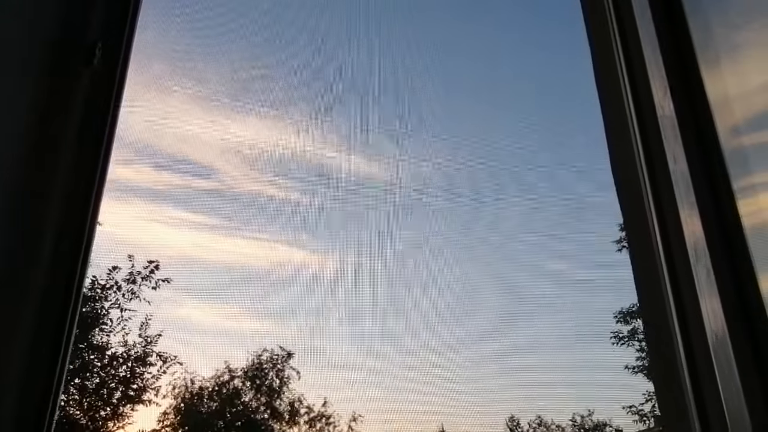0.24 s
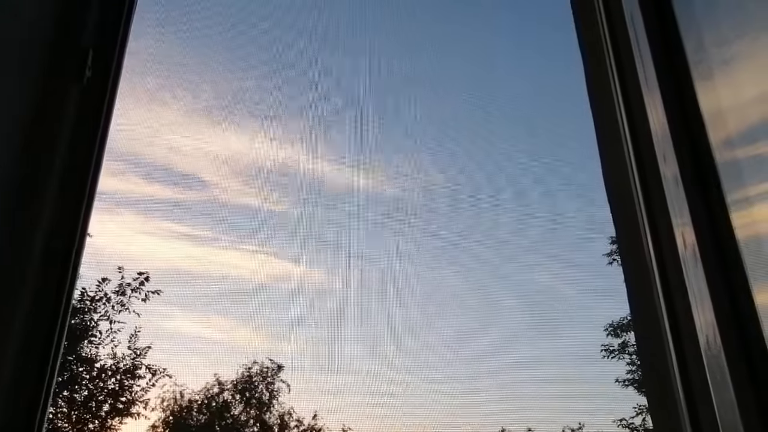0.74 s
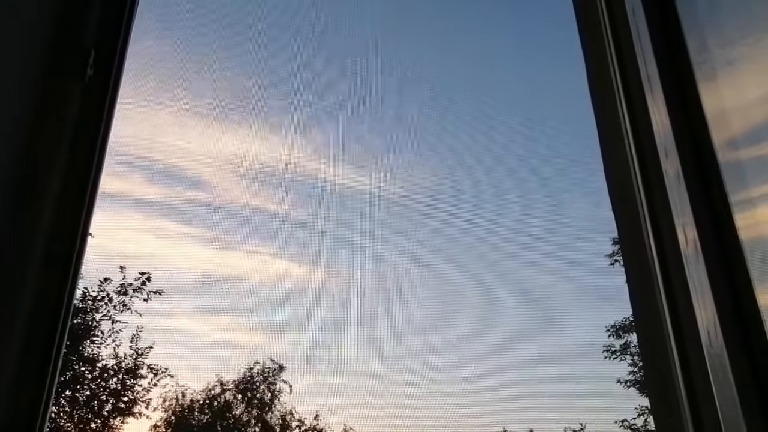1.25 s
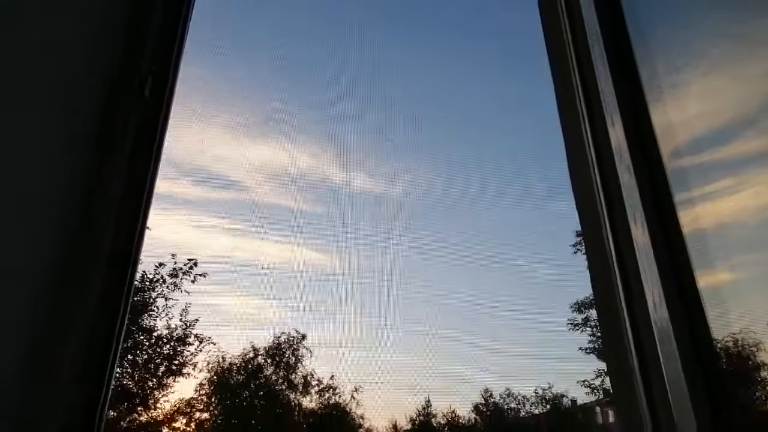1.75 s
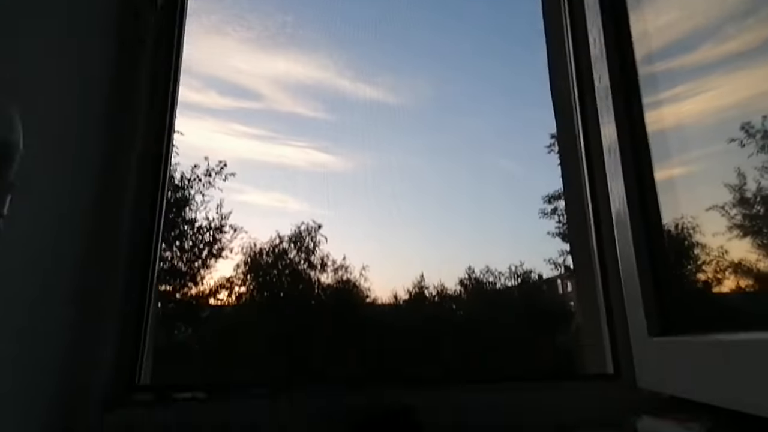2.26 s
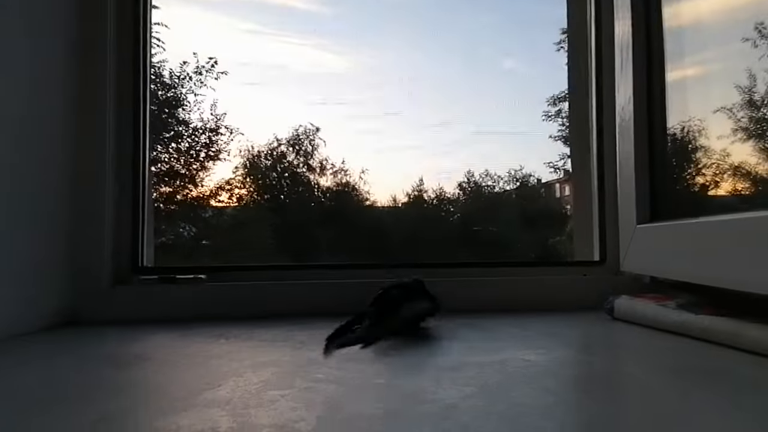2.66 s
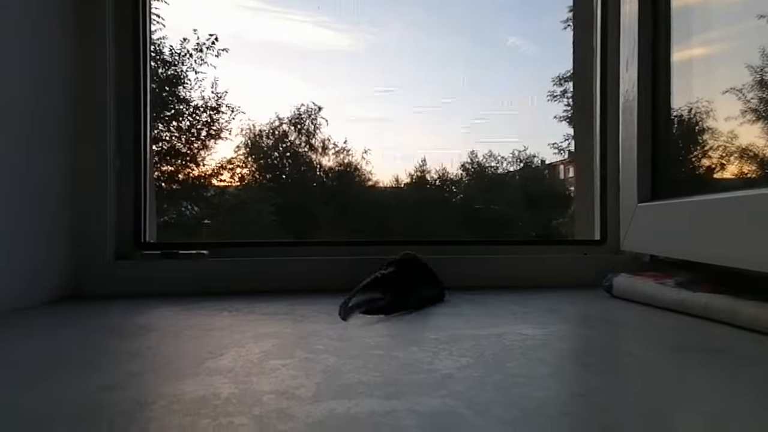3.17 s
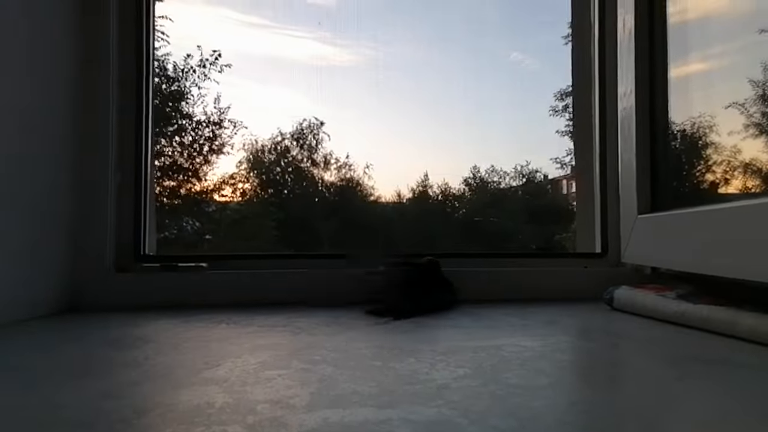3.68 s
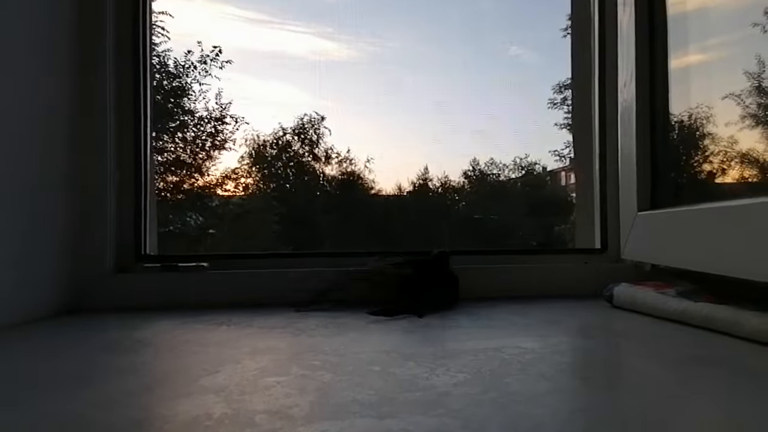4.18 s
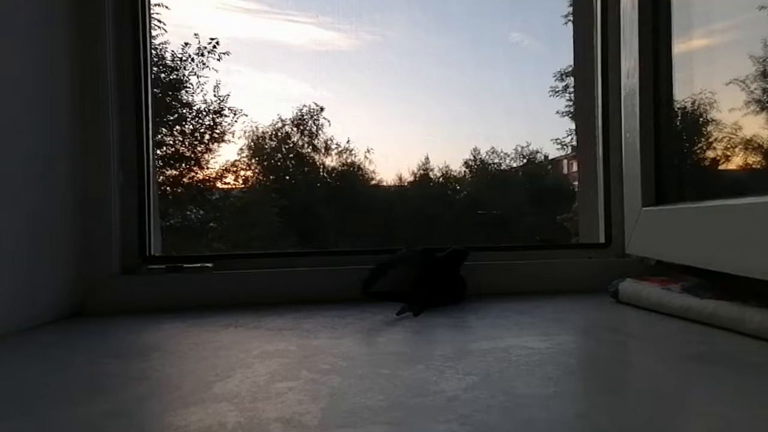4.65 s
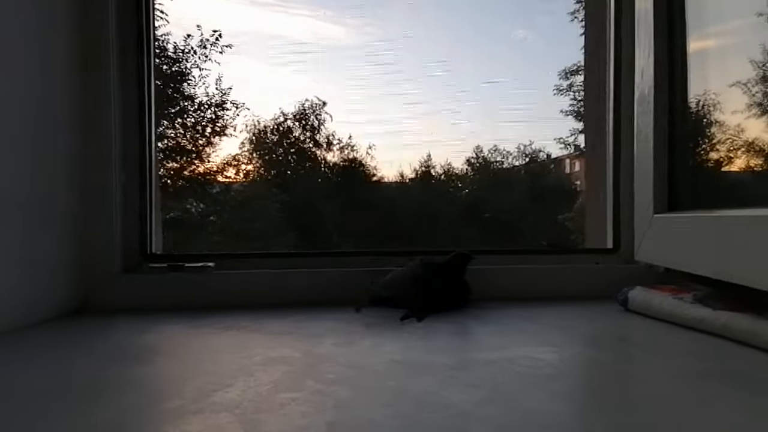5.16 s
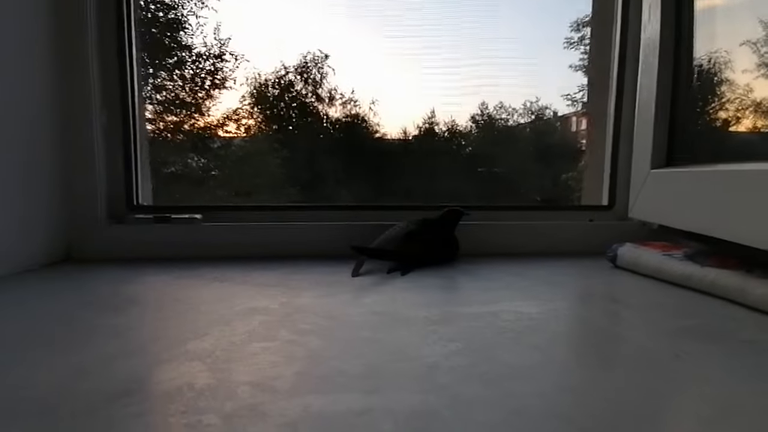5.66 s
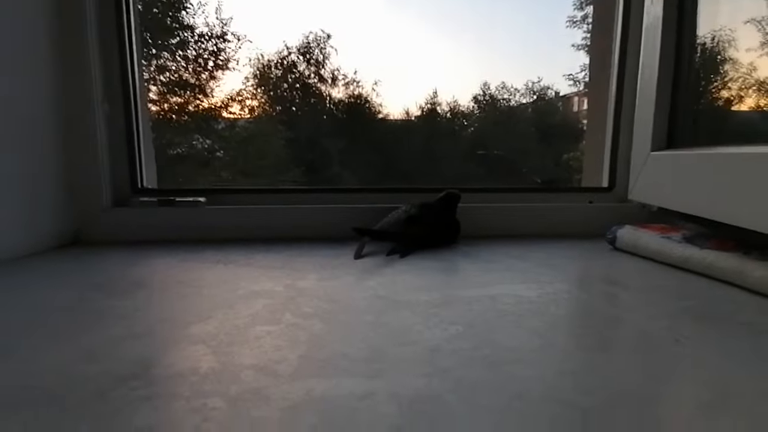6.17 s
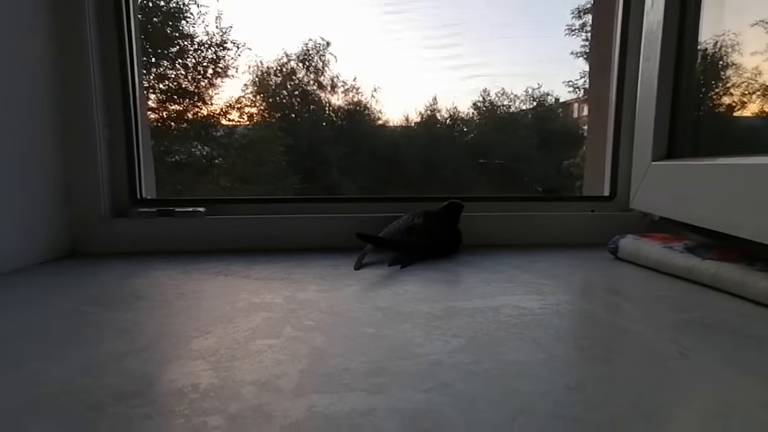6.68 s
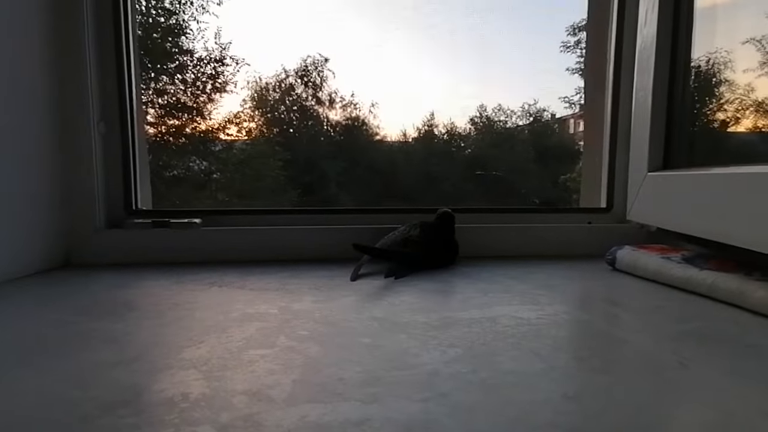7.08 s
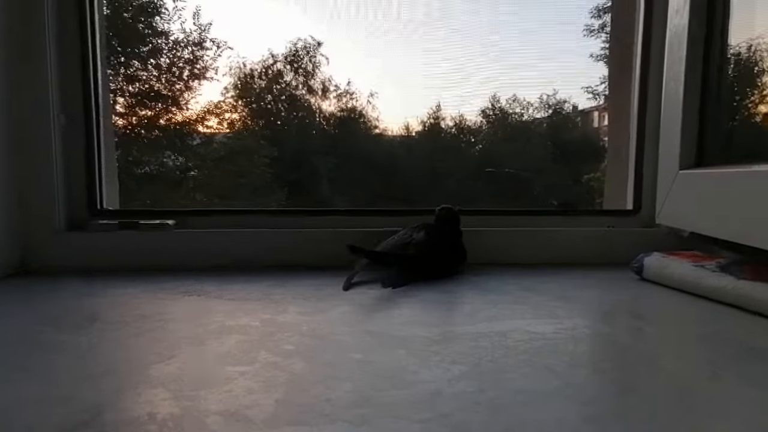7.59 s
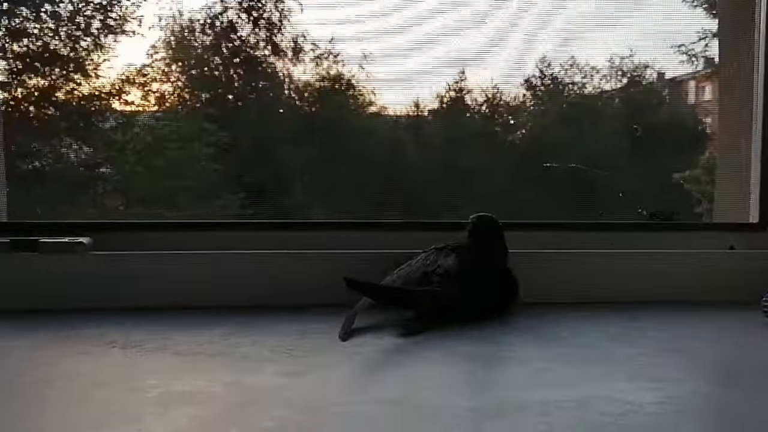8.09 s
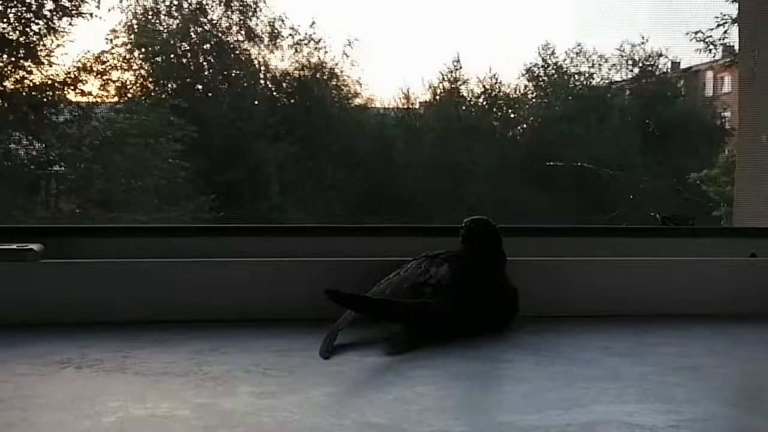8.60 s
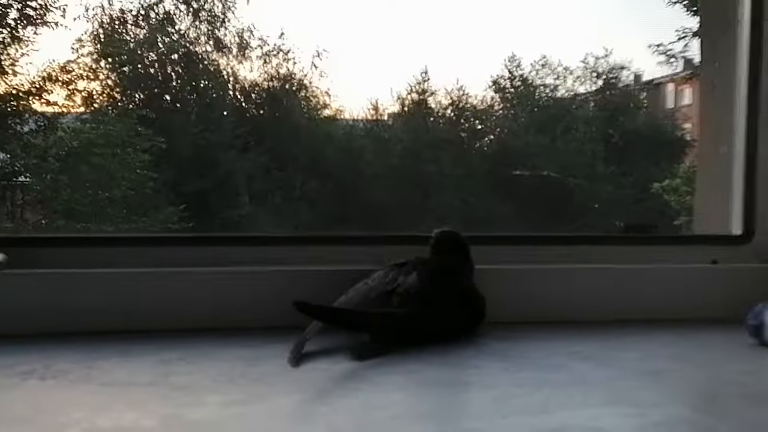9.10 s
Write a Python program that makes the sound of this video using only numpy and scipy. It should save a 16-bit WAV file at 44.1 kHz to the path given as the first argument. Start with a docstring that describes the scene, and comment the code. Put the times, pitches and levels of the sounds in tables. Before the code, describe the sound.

At an open window at dusk, a flock of swifts screams almost without pause: thin rising whistles turn buzzy and break into falling pips, echoing off house walls. Close to the stereo phone microphones, a grounded bird rustles its feathers and ticks its claws on the sill, mostly from two to four seconds. A wavering low hum and faint distant town noise stay underneath, and the calls thin toward the end.

```python
"""Swifts past an open window

At dusk a flock screams past: each whistle sweeps up, turns buzzy and breaks into falling pips; some calls are bare trills.
Farther birds come only as echoes, made of drifting sines; the house walls and window bay answer the near ones.
Close to the two microphones a grounded bird on the sill rustles (clumped noise) and ticks its claws (short cracks).
Two low unsteady tones and shaped town noise lie underneath, and a hand bumps the phone once."""
import sys
import numpy as np
from scipy import signal
from scipy.fft import rfft, irfft, next_fast_len
from scipy.io import wavfile
from scipy.ndimage import uniform_filter1d, map_coordinates

SR = 44100
rng = np.random.default_rng(int(sys.argv[2]) if len(sys.argv) > 2 else 0)


def bounce(signal):
    """Save signal as a 16-bit WAV file at the path given by the first command-line argument."""
    frames = np.transpose(np.atleast_2d(signal))
    limited = np.clip(frames, -1, 1)
    pcm = np.round(limited * 32767).astype(np.int16)
    wavfile.write(sys.argv[1], SR, pcm)


def volts(x):
    """Linear amplitude factor 10**(x/20) for a level x in dB, scalar or array-like."""
    e = np.asarray(x, float) / 20
    return 10 ** e


N = 411894


def unit(x):
    """Scaled to rms 1."""
    return x / np.sqrt(np.mean(x ** 2) + 1e-20)


def along(points, hz):
    """(frequency [Hz], value) points read on a log frequency axis."""
    f, v = np.transpose(points)
    return np.interp(np.log(hz + 1), np.log(f + 1), v)


def curves(rows):
    """One value per sample for each column after the time."""
    s, *cols = np.transpose(rows)
    return [np.interp(np.arange(N) / SR, s, c) for c in cols]


def wobble(rate, size=N):
    """A smooth random curve with rate knots a second, at most 400."""
    knots = rng.standard_normal(int(size * 400 / SR) + 4)
    return map_coordinates(knots, [np.arange(size) * min(rate, 400) / SR])


def coloured(x, spectrum):
    """x through a (frequency [Hz], gain [dB]) spectrum."""
    m = next_fast_len(N + 8192)
    gain = volts(along(spectrum, np.fft.rfftfreq(m, 1 / SR)))
    return irfft(rfft(x, m) * gain, m)[..., :N]


def echoes(x, t60, delay):
    """A diffuse answer after delay [s], falling 60 dB in t60 [s], different at each microphone."""
    t = np.arange(SR // 2) / SR
    tail = rng.standard_normal((2, len(t))) * volts(-60 * t / t60) * (t > delay)
    return signal.fftconvolve(x[None], tail / np.linalg.norm(tail[0]), axes=1)[:, :N]


# colour of the distant town: (frequency [Hz], relative level per Hz [dB])
TOWN_COLOUR = [(62, -1.5), (110, 6.5), (200, -3), (450, -4.5), (800, -12.5), (1500, -19), (2100, -20),
               (4000, -29), (7000, -19), (8000, -31), (15500, -34.5)]
# how alike the two microphones hear it: (frequency [Hz], left-right correlation [-1 to 1])
TOWN_LIKENESS = [(80, 0.23), (300, 1), (700, 0.053)]


def town():
    """Distant traffic and air: noise most alike at both microphones in the upper bass, nearly unrelated in the treble."""
    m = next_fast_len(N)
    hz = np.fft.rfftfreq(m, 1 / SR)
    # the angle between mid and side noise sets the correlation
    turn = np.arccos(np.clip(along(TOWN_LIKENESS, hz), -1, 1)) / 2
    spectrum = rfft(rng.standard_normal((2, m))) * volts(along(TOWN_COLOUR, hz))
    mid, side = irfft(spectrum * [np.cos(turn), np.sin(turn)], m)[:, :N]
    balance = volts([[1.4], [-1.4]])  # left, right
    return volts(-58.5) * unit(np.array([mid + side, mid - side])) * balance


# two hums, before their wobble and stereo balance: (time [s], lower hum level [dB], upper hum level [dB])
HUM_LEVELS = [(0, -62.5, -69.5), (1.56, -66, -79.5), (2.36, -55, -62), (3.38, -59.5, -57),
              (4.6, -61, -57.5), (5.82, -54, -57), (6.55, -51.5, -65), (7, -59.5, -64), (7.75, -48.5, -70),
              (8.48, -57, -63.5), (9.2, -48.5, -75)]


def hum():
    """Two low tones, slightly unsteady in pitch and level, stronger on the left."""
    low_db, high_db = curves(HUM_LEVELS)
    low_hz = 91 + 4 * wobble(12)
    high_hz = 128 + 3 * wobble(3.6)
    low = volts(low_db + 1.5 * wobble(23)) * np.sin(2 * np.pi * np.cumsum(low_hz) / SR)
    high = volts(high_db + 2.1 * wobble(16)) * np.sin(2 * np.pi * np.cumsum(high_hz) / SR)
    return (low + high) * volts([[2.2], [-2.6]])


def knock():
    """One soft low bump of a hand on the phone: a damped push and rebound, the same at both microphones."""
    start_s, decay_s = 2.1462, 0.0011
    u = np.maximum(np.arange(N) / SR - start_s, 0) / decay_s
    return volts(-34.0) * (1 - u) * np.exp(-u) * (1 - np.exp(-6 * u))


# farther birds, blurred by echoes: (time [s], centre pitch [Hz], level before the echoes [dB])
FAR_BIRDS = [(0, 6610, -48.5), (.3, 6200, -71), (.75, 5836, -53), (1.55, 5740, -53), (2.6, 5565, -65.5),
             (5.85, 5750, -79), (6.35, 5890, -49.5), (6.8, 6730, -67), (7.1, 5480, -51), (7.7, 5710, -67.5),
             (8.7, 5570, -64.5), (9.34, 5220, -64)]


def far_flock():
    """Twelve buzzing whistles that drift round a common pitch, heard only through echoes."""
    centre_hz, db = curves(FAR_BIRDS)
    voices = 0
    for _ in range(12):
        hz = centre_hz + 230 * wobble(8) + 200 * wobble(250)  # slow drift and fast buzz
        level = volts(3 * wobble(9) + 5 * wobble(80))
        voices = voices + level * np.sin(2 * np.pi * np.cumsum(hz) / SR)
    return echoes(volts(db) * unit(voices), t60=0.2, delay=0)


def cracks(rows, spectrum):
    """Dry snaps: noise that dies within a few milliseconds, then coloured."""
    out, t = np.zeros(N + SR), np.arange(400) / SR
    for s, db in rows:
        snap = np.exp(-(t / 0.002) ** 2) * rng.standard_normal(len(t))
        out[round(s * SR):][:len(t)] += volts(db) * snap
    return coloured(out[:N], spectrum)


# feather strokes on the sill: (time of peak [s], level before the grain and left-hand colour [dB])
FEATHER_STROKES = [(1.51, -60.5), (1.599, -53.5), (1.754, -54.5), (1.927, -42.5), (2.151, -57),
                   (2.447, -55.5), (2.698, -45.5), (3.175, -48.5), (3.42, -55.5), (3.502, -61.5),
                   (3.702, -45), (4.084, -53), (4.152, -52)]
# feather colour: (frequency [Hz], relative level per Hz [dB])
FEATHER_COLOUR = [(1600, -24), (2500, -13.5), (3200, -18.5), (4600, -13), (7000, -2.5), (8700, -2.5),
                  (10800, -9.5), (15500, -10)]
# claw ticks: (time [s], level before colour [dB])
CLAW_TICKS = [(2.439, -56), (4.0627, -48.5), (4.073, -61), (4.214, -66), (5.332, -72), (5.532, -66),
              (6.0936, -63), (7.918, -65)]
# thin quill snaps, mostly treble: (time [s], level before colour [dB])
QUILL_SNAPS = [(1.1923, -55.5), (1.357, -56.5), (1.4042, -50)]


def sill_bird():
    """Feathers: clumped noise under each stroke. Claws and quills: short cracks and their slap off the window bay."""
    t = np.arange(N) / SR
    swell_s, fade_s = 0.026, 0.06
    stroke = sum(volts(db) * np.exp(np.where(t < s, -((t - s) / swell_s) ** 2, (s - t) / fade_s))
                 for s, db in FEATHER_STROKES)
    grain = volts(2.1 * wobble(55) + 1.7 * wobble(390))
    # barbs catch at one pitch, then another: patches of louder noise
    z = signal.stft(rng.standard_normal((3, N)), nperseg=256)[2]
    patches = uniform_filter1d(rng.standard_normal(z.shape[1:]), size=8, axis=0)
    patches = uniform_filter1d(patches, size=5, axis=1)
    noise = signal.istft(z * volts(4 * unit(patches)), nperseg=256)[1][:, :N]
    shared_and_own = 0.2 * noise[0] + noise[1:]  # a little in common, the rest each microphone's own
    rustle = stroke * unit(coloured(grain * shared_and_own, FEATHER_COLOUR))

    quills = cracks(QUILL_SNAPS, [(6000, -12), (8500, 9), (16000, 5)])
    claws = cracks(CLAW_TICKS, [(700, -28), (2300, 14.0), (4200, 11.0), (8500, 15.0), (16000, -23)])
    snaps = quills + claws
    left, right = rustle + snaps + volts(-7) * echoes(snaps, t60=.06, delay=.004)
    # the left microphone hears the sill best, but the top treble favours the right
    return np.array([coloured(left, [(9500, 5), (12500, -7)]), right])


def scream(length, top_hz, rise, left_share):
    """One scream as an analytic signal: a rising whistle, a buzz that deepens, then falling pips."""
    t = np.arange(round(.7 * SR)) / SR
    late = np.maximum(t - length, 0)  # time since the pips began [s]
    pip = (late / .024) % 1  # place within each 24 ms pip
    climb = 1 - np.exp(-(t / rise) ** .74)
    grow = np.clip(t / length, 0, 1) ** 1.1
    hz = 4200 + (top_hz - 4200) * climb
    hz -= 25 * grow ** 5  # the pitch sags as the breath runs out
    hz += 14 * wobble(60, size=len(t)) + 42 * grow * wobble(300, size=len(t))
    # each pip is a short downstroke, and the train sinks ever faster
    hz -= (rng.uniform(20000, 60000) * late ** 2 + 700 * (pip - .75)) * (late > 0)
    phase = 2 * np.pi * np.cumsum(hz) / SR

    # a second oscillator in the throat beats with the whistle, mostly as a line above it
    buzz_hz = 275 - 40 * grow + 14 * wobble(44.15, size=len(t))
    buzz = 2 * np.pi * np.cumsum(buzz_hz) / SR
    lines = 1 + grow * (.45 * np.exp(1j * buzz) + .22 * np.exp(-1j * buzz))
    # the whistle is the second harmonic; the third sounds faintly, more from birds on the left
    lines = lines + volts(-21 - 22 * grow) * left_share ** 2 * np.exp(1j * phase / 2)

    opening = climb ** 2.1  # the beak opens as the pitch climbs
    held = opening * volts(-4 * grow ** 3 + 3.2 * wobble(70, size=len(t))) * (late == 0)
    pips = np.exp(-((pip - .75) / .12) ** 2) * volts(3 - 55 * late) * (late > 0) * (late < .1)
    return (uniform_filter1d(held, size=150) * lines + pips) * np.exp(1j * phase)


def trill(length, period, first_hz, last_hz):
    """Short downstrokes at a steady rate; the train sinks ever faster and fades as it leaves the beak's range."""
    t = np.arange(round((length + period) * SR)) / SR - period / 2
    pip = t - period * np.round(t / period)  # time from the nearest pip centre [s]
    hz = first_hz + (last_hz - first_hz) * (t / length) ** 2 - 70000 * pip
    level = volts((hz - first_hz) / 60 + 3 * wobble(50, size=len(t)))
    return np.exp(-(pip / .0025) ** 2) * level * np.exp(2j * np.pi * np.cumsum(hz) / SR)


# near screams: (start [s], start of the pips [s], pitch climbed towards [Hz], rise time [s],
# level before its own swell and panning [dB])
NEAR_SCREAMS = [(0.075, 0.32, 6380, 0.041, -55), (0.17, 0.47, 5830, 0.031, -58),
                (0.45, 0.747, 6470, 0.031, -53), (0.484, 0.593, 5600, 0.075, -46),
                (0.574, 0.735, 5590, 0.017, -47.5), (0.724, 0.925, 6324, 0.032, -45.5),
                (0.841, 1.022, 5410, 0.03, -50), (1.036, 1.418, 6425, 0.065, -41),
                (1.089, 1.438, 5400, 0.032, -48.5), (1.555, 1.78, 6550, 0.046, -45.5),
                (1.715, 2.106, 6020, 0.11, -37), (1.842, 2.212, 6240, 0.073, -43),
                (1.929, 2.169, 5285, 0.02, -44.5), (2.005, 2.152, 5890, 0.039, -49),
                (2.146, 2.321, 5790, 0.037, -42), (2.291, 2.474, 5750, 0.026, -41.5),
                (2.515, 2.919, 5890, 0.13, -43), (2.792, 2.967, 5610, 0.071, -45.5),
                (2.862, 3.129, 5452, 0.056, -43.5), (3.346, 3.797, 6247, 0.053, -45),
                (3.361, 3.613, 6234, 0.021, -41), (3.627, 3.917, 5806, 0.043, -44.5),
                (3.966, 4.292, 5956, 0.022, -40.5), (4.167, 4.334, 6000, 0.057, -49),
                (4.308, 4.527, 5690, 0.074, -39.5), (4.398, 4.855, 6210, 0.097, -48.5),
                (4.605, 4.888, 5810, 0.063, -49), (4.983, 5.242, 5790, 0.02, -51),
                (5.328, 5.747, 6226, 0.069, -48), (5.343, 5.565, 5940, 0.043, -48.5),
                (5.88, 6.104, 5650, 0.024, -45), (5.89, 6.158, 5950, 0.059, -50.5),
                (5.903, 6.078, 5606, 0.054, -41.5), (6.285, 6.654, 5693, 0.03, -47.5),
                (6.468, 6.885, 5800, 0.22, -48), (6.926, 7.158, 5490, 0.049, -39),
                (6.961, 7.321, 5944, 0.045, -48.5), (7.042, 7.196, 6060, 0.048, -41.5),
                (7.179, 7.442, 5840, 0.053, -48), (7.463, 7.756, 6370, 0.039, -52),
                (7.531, 7.837, 5660, 0.078, -52), (7.868, 8.171, 5820, 0.023, -50.5),
                (7.92, 8.285, 5654, 0.089, -44.5), (8.204, 8.366, 5330, 0.089, -53),
                (8.462, 8.855, 6240, 0.1, -56), (8.541, 8.891, 5640, 0.094, -53),
                (9.138, 9.398, 5900, 0.036, -60.5), (9.169, 9.402, 5700, 0.075, -60)]
# trains of bare pips: (first pip [s], length [s], period [s], first pitch [Hz], last pitch [Hz],
# level before its own fade and panning [dB])
PIP_TRILLS = [(3.229, 0.094, .0265, 5550, 5260, -49.5), (3.618, .1, .014, 5950, 5800, -36.5),
              (5.17, 0.032, .028, 5300, 4900, -54), (6.195, 0.15, .023, 5700, 5300, -43.5),
              (8.396, 0.17, .0148, 5400, 3600, -45.5)]
# where the flock is: (time [s], left minus right [dB])
FLOCK_PAN = [(0, -11), (1.2, -8.5), (2.6, -5), (4.1, -14), (5.1, -3.5), (6.2, 7.5), (7.5, 2)]


def swifts():
    """Near birds reach the two microphones about a quarter cycle apart; walls and window bay add echoes."""
    near, unpanned = np.zeros((2, N + SR)), np.zeros(N + SR)

    def left_share(s):
        """The left microphone's part of the power, 0 to 1."""
        # level is doubled here to give the inverse power ratio
        return 1 / (1 + volts(-2 * np.interp(s, *np.transpose(FLOCK_PAN))))

    calls = [(s, db, scream(end - s, top_hz, rise, left_share(end)))
             for s, end, top_hz, rise, db in NEAR_SCREAMS]
    calls += [(s - period / 2, db, trill(length, period, *hz))
              for s, length, period, *hz, db in PIP_TRILLS]
    for s, db, call in calls:
        left = left_share(s + .2)
        gains = np.sqrt(2 * np.array([[left], [1 - left]]))
        turns = np.array([[1], [np.exp(1j * rng.uniform(1.1, 1.9))]])  # phase lead on the right [rad]
        near[:, round(s * SR):][:, :len(call)] += (volts(db) * gains * turns * call).real
        unpanned[round(s * SR):][:len(call)] += call.real * volts(db)

    pan_db, = curves(FLOCK_PAN)
    bay = volts(-11.5) * echoes(unpanned[:N], t60=0.041, delay=0.0025)
    walls = volts(-9.0) * echoes(unpanned[:N], t60=0.67, delay=0.018)
    return near[:, :N] + (bay + walls) * volts([pan_db / 2, -pan_db / 2])


def scene():
    """Everything at the window, from the far town to the near flock."""
    return town() + hum() + knock() + far_flock() + sill_bird() + swifts()


def roll_off(x):
    """The treble ends steeply here."""
    return signal.sosfilt(signal.butter(12, 15900, fs=SR, output="sos"), x)


def record(dry):
    """The finished stereo mix as the phone keeps it."""
    return roll_off(dry)


dry = scene()
out = record(dry)
bounce(out)
```